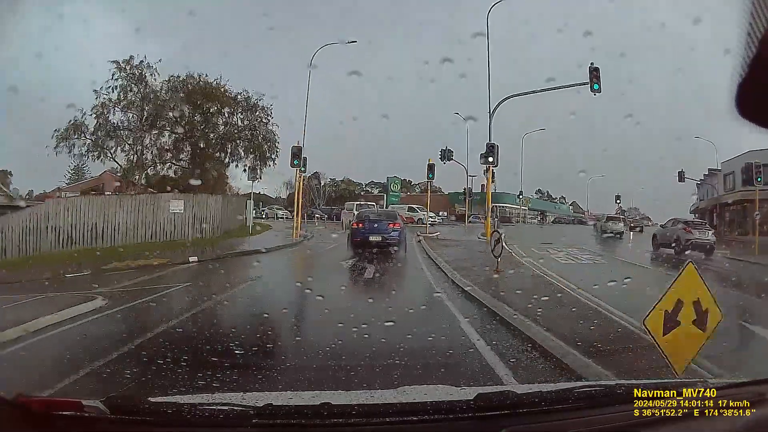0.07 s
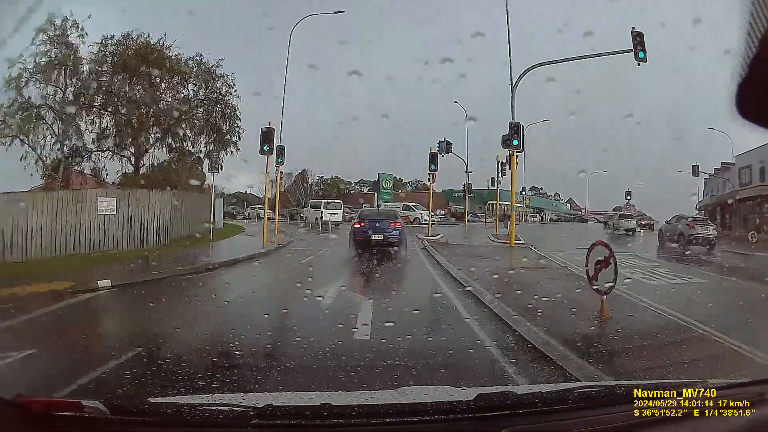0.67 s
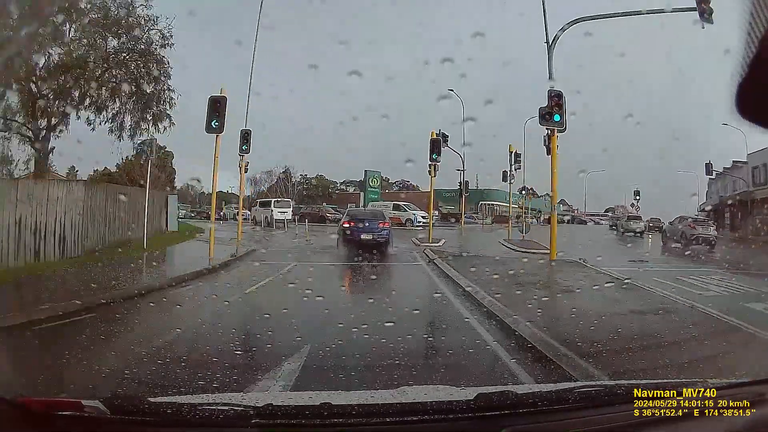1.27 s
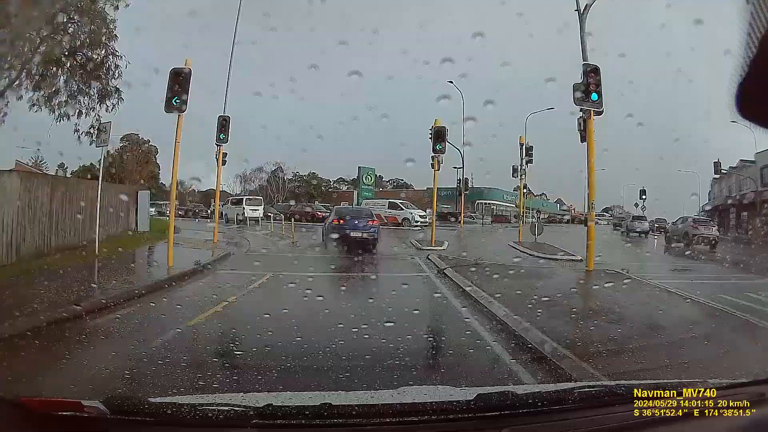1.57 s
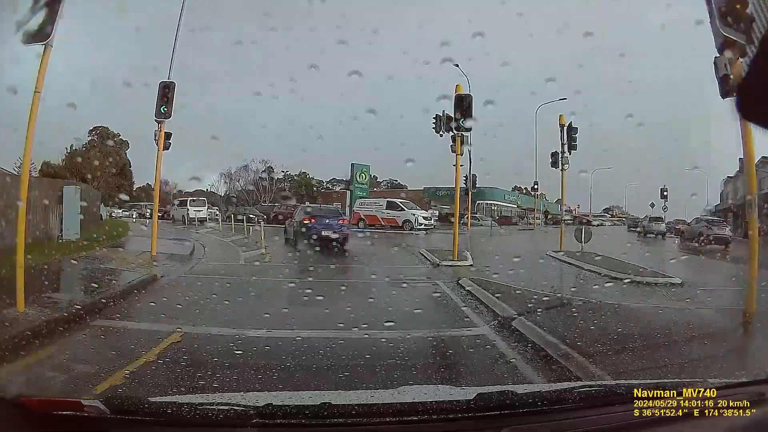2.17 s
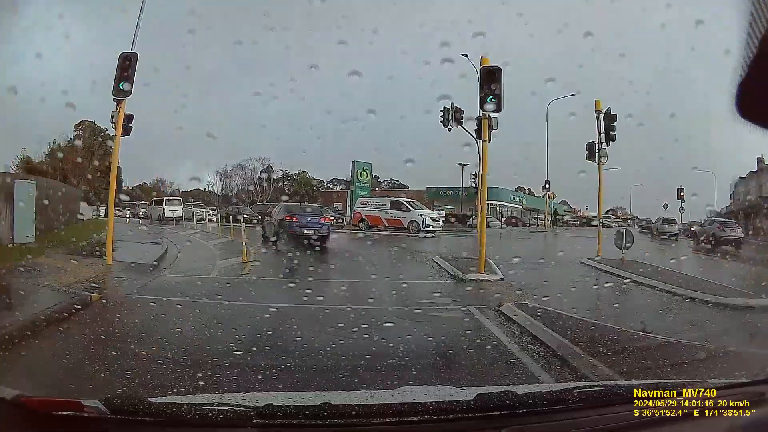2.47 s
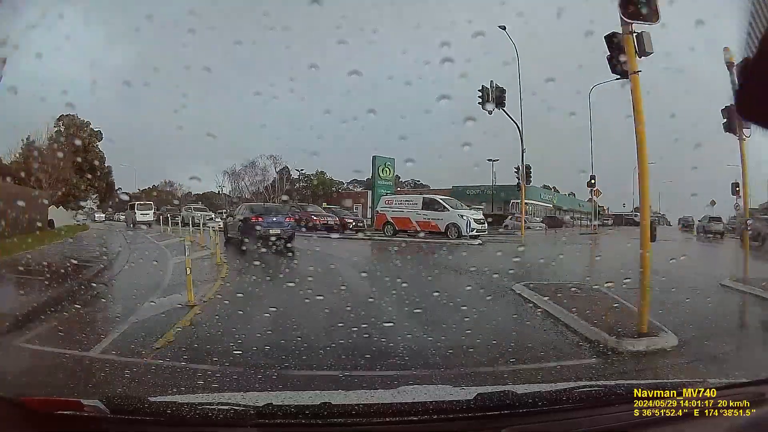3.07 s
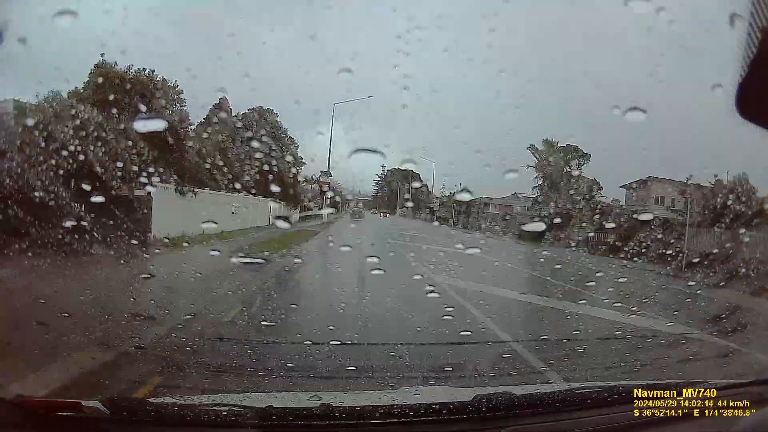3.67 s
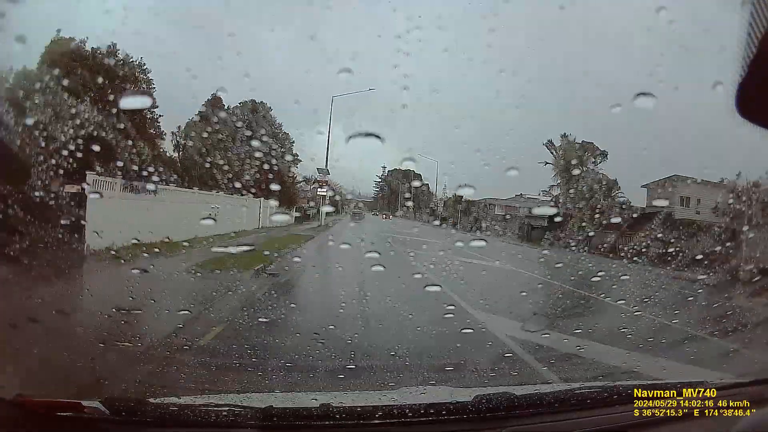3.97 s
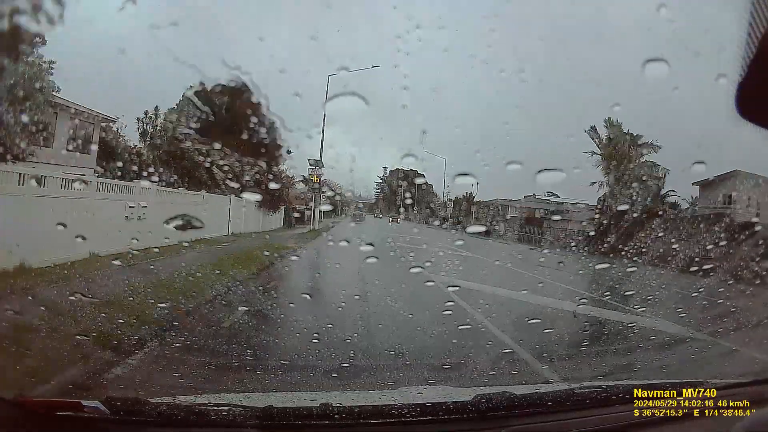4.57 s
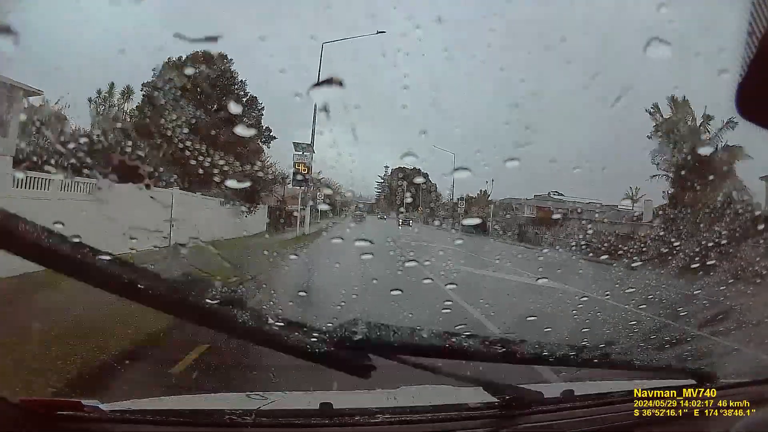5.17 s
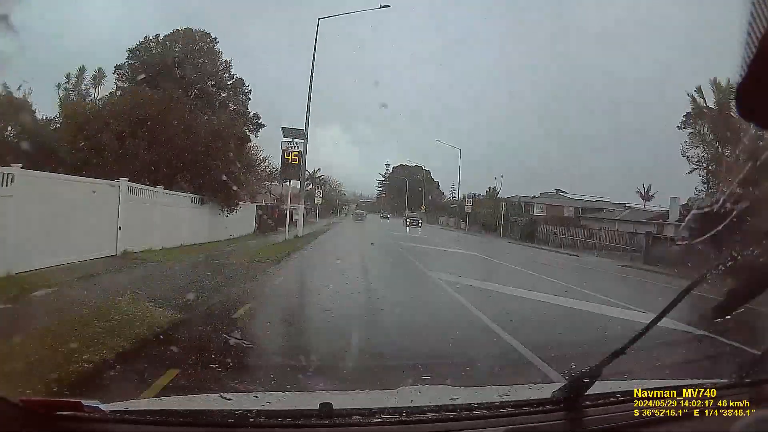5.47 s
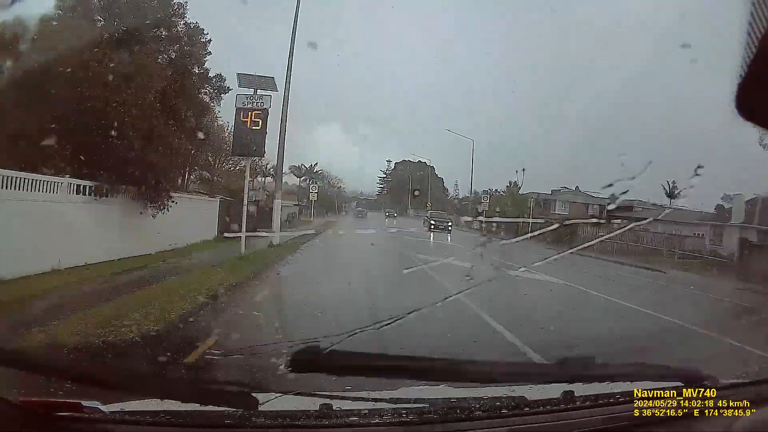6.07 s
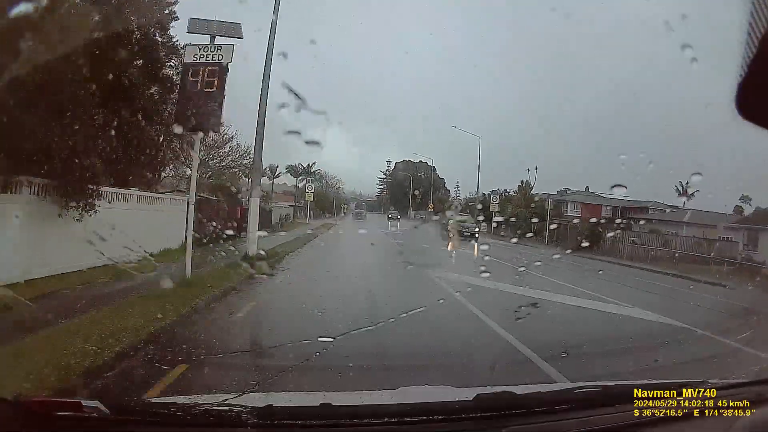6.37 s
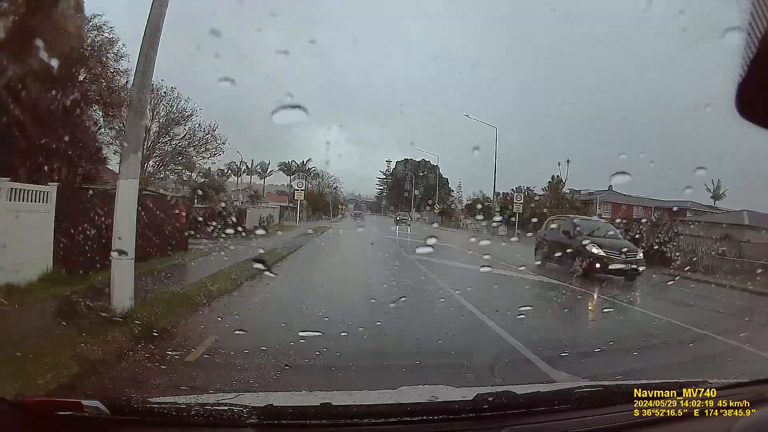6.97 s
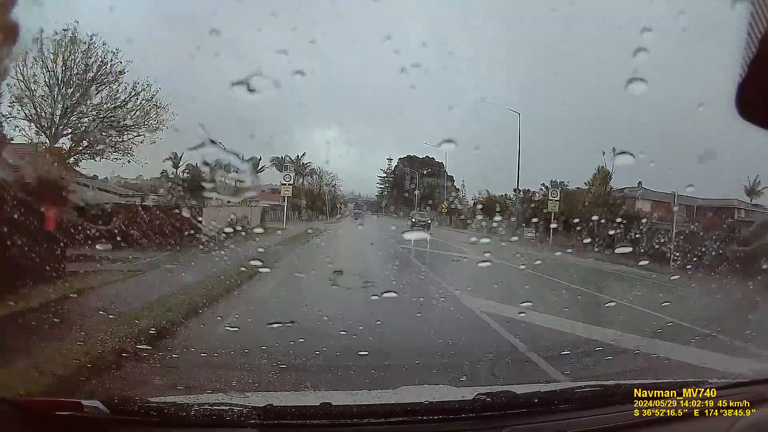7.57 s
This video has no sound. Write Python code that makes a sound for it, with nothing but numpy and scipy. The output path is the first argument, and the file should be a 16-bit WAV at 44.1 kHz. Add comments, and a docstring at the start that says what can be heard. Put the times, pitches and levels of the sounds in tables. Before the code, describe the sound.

Inside a car, engine hum and tyre rumble in light rain switch abruptly to a loud downpour pelting the windscreen and roof.

```python
"""Inside a car on a wet road, heard from a small camera fixed to the windscreen.
The car pulls gently through a junction in light rain: the engine hums, a gear whine rises, the tyres
rumble and drops tick on the glass. After an abrupt cut it drives faster through a downpour, and the
wheels thump over a bump. Each drop is an impulse that excites what it strikes: the glass cracks,
the roof drums and the camera housing rings in its natural modes."""
import sys
import numpy as np
from scipy import signal
from scipy.fft import rfft, irfft
from scipy.io import wavfile
from scipy.ndimage import uniform_filter1d

SR = 44100
rng = np.random.default_rng(int(sys.argv[2]) if len(sys.argv) > 2 else 0)


def pcm_store(signal):
    """Save signal as 16-bit PCM."""
    levels = np.round(np.clip(np.atleast_2d(signal), -1, 1) * 32767)
    wavfile.write(sys.argv[1], SR, levels.astype(np.int16).T)


N = 344862
TIME = np.arange(N) / SR
CUT_START_S, CUT_END_S = 3.666, 3.687

# A drop's crack through the glass, and its spray. Each row: frequency in Hz, relative density in dB.
CRACK_SPECTRUM = [(300, -20.5), (800, -5), (1250, 2), (1500, 0.5), (1800, -0.5), (2150, 0.5), (2420, -7),
                  (2780, -16), (3700, -11), (4270, -6.5), (4750, -22), (5300, -22), (7000, -28.5),
                  (15000, -52)]
SPRAY_SPECTRUM = [(2000, 7), (5000, 4), (6000, 2), (6700, -1.5), (8000, 0), (9600, -5.5), (11800, -2.5),
                  (13300, 1.5), (14500, -2.5), (15800, -15)]
# Modes of the pane and of the housing. Each row: frequency in Hz, gain in dB, 60 dB decay in seconds.
PANE_MODES = [(2186, -3.5, 0.02), (2295, -3.5, 0.013), (4235, -10, 0.011)]
HOUSING_MODES = [(1036.4, 3, 0.053), (1090, -4, 0.027), (926, -9, 0.022)]

def windscreen(big, rain_db, spray_db, patter_db):
    """Impact excitation: drops crack on the glass and ring pane and housing; faster ones spray more."""
    big_crack, big_ring, big_tick, big_spray = big
    small = from_db(rain_db) * shower(per_s=230, spread_db=9.5, max_sigma=1.26)
    droplets = from_db(rain_db) * shower(per_s=720, spread_db=8, max_sigma=2.6)
    blows = from_db(-3) * small + from_db(-14.5) * droplets + from_db(6.5) * big_crack
    crack = colour(scatter(blows, t60=0.015, cabin_db=-4, cabin_t60=0.053), CRACK_SPECTRUM)
    fine_spray = from_db(spray_db) * (from_db(-16.5) * small + from_db(-15.5) * droplets)
    spray = fine_spray + from_db(24) * big_spray
    splash = colour(scatter(spray, t60=0.01, cabin_db=0.5, cabin_t60=0.035), SPRAY_SPECTRUM)
    tick = struck(from_db(-20.5) * small + from_db(5.5) * big_tick, PANE_MODES, swell_t60=0.0039)
    # the housing also picks up the patter from all over the pane
    patter = from_db(rain_db + patter_db) * shower(per_s=900, spread_db=3, max_sigma=2.4)
    housing_blows = from_db(-23) * small + patter + from_db(1.5) * big_ring
    return crack + splash + tick + struck(housing_blows, HOUSING_MODES, swell_t60=0.0062)


# The biggest drops. Each row: start in seconds, strength in dB, then ring, tick and spray in dB above it.
BIGGEST_DROPS = [(0.3596, -24.5, -9, -18, -39), (0.5372, -26, -10, -19, -36), (1.2036, -25, -9, -16, -39),
                 (1.2517, -31, -9, -15, -33), (1.3854, -28, -5, -16, -33), (1.4127, -23.5, -12, -17, -37),
                 (1.509, -27.5, -21, -5, -35), (1.708, -27, -9, -19, -34), (1.849, -26, -14, -20, -39),
                 (1.917, -26.5, -13, -8, -34), (2.1104, -30, -10, -18, -29), (2.3315, -27.5, -15, -9, -31),
                 (2.393, -34, -18, 2.5, -35), (2.9065, -25, -8, -9, -34), (3.0003, -28.5, -8, -14, -35),
                 (3.688, -5.5, -17, -14, -23.5), (3.7506, -8, -5, -11, -18),
                 (3.8193, -2.5, -8.5, -10.5, -26), (3.8254, -6, -10, -15, -23),
                 (3.9404, -4.5, -11, -25, -23.5), (3.9718, -1.5, -5.5, -26, -25.5),
                 (4.0488, 2.5, -12, -18, -24.5), (4.2174, -3.5, -21, -8.5, -26),
                 (4.2808, 0.5, -17, -27, -27.5), (4.3276, -5.5, -15, -13, -22), (4.3783, -14, -7, -20, -28),
                 (4.4509, -4.5, -7.5, -15, -37), (4.4847, 2.5, -16.5, -24, -27),
                 (4.583, -2.5, -6, -21, -22.5), (4.6537, -8.5, -11, -17, -23), (4.67, 0, -9, -14, -25),
                 (4.8155, 1.5, -12.5, -16, -26.5), (4.8855, -6, -8, -11, -21), (5.036, -9.5, -17, -6, -28),
                 (5.0906, -3.5, -15, -20, -34), (5.1402, -2, -5.5, -24, -23.5),
                 (5.3084, -0.5, -10.5, -3.5, -26), (5.335, -6, -11, -6.5, -33), (5.3702, -3, -5, -23, -24),
                 (5.4201, -10, -8, -11, -32), (5.4826, -8, 0.5, -16, -38), (5.5082, -3.5, -6, -19, -26),
                 (5.7098, -14, -6, -15, -26), (5.797, -5, -11, -17, -35), (5.8562, -1.5, -5, -18, -25),
                 (5.9095, -2, -15, -12, -25), (6.0875, -4, -6.5, -14, -23), (6.1753, -3.5, -5, -24, -34),
                 (6.2228, -3.5, -13, -10, -32), (6.2673, -1, -4.5, -20, -21), (6.3035, -3, -9, -15, -28),
                 (6.324, -7, -13, -18, -34), (6.5236, -3.5, -8, -18, -29), (6.6189, 3, -13.5, -21, -30),
                 (6.685, 3, -23, -18, -29.5), (6.7308, -3, -17, -15, -29), (6.8957, -11, -6, -14, -27),
                 (6.9257, -1, -8, -18, -29), (6.9552, -6, -9, -9, -25), (6.977, -1, -12.5, -13, -30),
                 (7.0464, -9.5, -8, -17, -33), (7.117, -1.5, -11, -20, -31), (7.198, -8.5, -11, -2.5, -39),
                 (7.2754, -6.5, -16, -15, -25), (7.3446, -6, -10.5, -19, -19.5), (7.366, -8, -8, -8, -32),
                 (7.4549, -6, -7, -19, -22), (7.4621, -8, -5, -17, -20), (7.5909, -8.5, -9, -21, -16.5),
                 (7.7196, -7.5, -14, -6, -20)]

def big_drops(rain_db):
    """Brief impacts act as impulses: one train each for crack, housing ring, pane tick and spray."""
    start_s, strength_db, *colour_db = np.vstack([middling_drops(rain_db), BIGGEST_DROPS]).T
    blows = np.zeros((4, N))
    blows[:, np.round(start_s * SR).astype(int)] = from_db([strength_db + db for db in (0, *colour_db)])
    return blows


def middling_drops(rain_db, per_s=20, above_rain_db=11.5):
    """The point of impact sets the timbre: each random drop gets its own ring, tick and spray levels."""
    chance = rng.standard_normal((400, 5))
    start_s = (np.arange(len(chance)) + chance[:, 0] / 3) / per_s
    strength_db = np.interp(start_s, TIME, rain_db) + above_rain_db + np.clip(chance[:, 1], -2, 1)
    colour_db = [-11, -15.5, -25] + 5 * np.clip(chance[:, 2:], -2, 1)
    return np.column_stack([start_s, strength_db, colour_db])[(start_s > 0) & (start_s < TIME[-1])]


# Light rain, then the downpour. Each row: time in seconds, strength in dB.
RAIN_TREND = [(0, -53.5), (.4, -50.5), (1.0, -52), (1.25, -49.5), (1.7, -50), (2.0, -52), (3.25, -53),
              (3.66, -48), (3.69, -24.5), (4.6, -22.5), (5.35, -20.5), (5.75, -21.5), (6.35, -21.5),
              (7.25, -25), (7.82, -22.5)]
# Lulls between sheets of rain. Each row: centre in seconds, half length in seconds, depth in dB.
RAIN_LULLS = [(4.203, 0.019, 15), (4.762, 0.026, 4.5), (4.872, 0.0098, 7), (4.965, .035, 8),
              (5.216, 0.024, 9), (6.479, 0.019, 12), (6.703, 0.015, 17), (7.021, 0.011, 12)]

def rainfall():
    """Amplitude modulation: rain arrives in uneven sheets, so its strength in dB surges and dips."""
    trend_db, = in_time(RAIN_TREND)
    surge_db = 2.05 * drift(per_s=26)
    lull_db = sum(depth_db * np.exp(-((TIME - s) / half_s) ** 2) for s, half_s, depth_db in RAIN_LULLS)
    return trend_db + surge_db - lull_db


# Response of the lined roof. Each row: frequency in Hz, relative density in dB.
ROOF_SPECTRUM = [(70, -39), (140, -5), (200, -2.5), (275, 1), (325, -2), (425, 3), (560, -1), (660, 1.5),
                 (900, -3), (1300, -10.5), (2500, -24.5), (6000, -44)]
# Dull knocks: a small rattle as the car meets a bump, then heavy splats on the roof.
# Each row: start in seconds, strength in dB.
DULL_KNOCKS = [(2.555, -11), (4.31, 2), (4.68, 7), (5.04, 9), (5.722, 9.5), (5.86, 9), (6.134, 6.5),
               (6.19, 5), (6.745, 10.5), (7.29, 5), (7.454, 6)]

def roof(big_blows, roof_db):
    """Superposition: drops on the steel roof merge into a drumming, with a dull knock now and then."""
    drops = shower(per_s=900, spread_db=5, max_sigma=1.8)
    start_s, knock_db = np.transpose(DULL_KNOCKS)
    knocks = np.zeros(N)
    knocks[np.round(start_s * SR).astype(int)] = from_db(knock_db)
    blows = from_db(roof_db - 1) * drops + from_db(2.5) * big_blows
    drumming = scatter(blows, t60=0.02, cabin_db=-2.5, cabin_t60=0.062)
    return colour(drumming + scatter(knocks, t60=0.087, cabin_db=1, cabin_t60=0.15), ROOF_SPECTRUM)


# Wheel jolts. Each row: centre in seconds, envelope peak in dB, frequency in Hz, half length in seconds.
WHEEL_JOLTS = [(1.302, -36, 55, .03), (2.584, -30, 60, 0.055), (3.963, -9.5, 112, 0.015),
               (4.048, -9, 123, 0.013), (4.169, -14, 105, 0.0045), (4.245, -23, 58.4, 0.046),
               (7.63, -23.5, 58, 0.057)]

def bumps():
    """Transient response: a wheel crossing a bump booms in the cabin, a sine under a Gaussian envelope."""
    return sum(from_db(db) * np.exp(-((TIME - s) / half_s) ** 2) * np.sin(2 * np.pi * hz * (TIME - s))
               for s, db, hz, half_s in WHEEL_JOLTS)


# Tyres on the road. Each row: time in seconds, cabin rumble in dB, body shake in dB.
ROAD_LEVELS = [(0, -33, -42), (2.0, -32.5, -49), (3.66, -30.5, -44), (3.69, -32.5, -46), (5.0, -31, -44),
               (6.7, -33, -45), (7.82, -32.5, -34)]
# Cabin rumble and body shake. Each row: frequency in Hz, relative density in dB.
RUMBLE_SPECTRUM = [(40, -26), (78, -19), (100, -2), (130, 5.5), (160, -3), (200, -5), (275, -1.5),
                   (325, -8), (460, -11), (640, -14.5), (750, -20), (1200, -23.5), (2300, -34), (2900, -41),
                   (9000, -61)]
SHAKE_SPECTRUM = [(12, -14), (22, -11), (33, -13), (45, -6), (58, 6), (78, -7), (120, -26), (400, -59)]

def road(settle_s=0.14):
    """Forced vibration: tyres drive the cabin and the sprung body; both flare at a bump and settle."""
    rumble_db, shake_db = in_time(ROAD_LEVELS)
    jolt = sum(from_db(db) * (TIME > s) * np.exp(-np.abs(TIME - s) / settle_s)
               for s, db, _, _ in WHEEL_JOLTS)
    rumble = np.hypot(from_db(rumble_db + drift(per_s=9)), from_db(-16.5) * jolt)
    shake = np.hypot(from_db(shake_db), from_db(-22) * jolt)
    return rumble * colour(noise(), RUMBLE_SPECTRUM) + shake * colour(noise(), SHAKE_SPECTRUM)


# The engine's course. Each row: time in seconds, firing rate in Hz, hum level in dB.
ENGINE_COURSE = [(0, 45.95, -45.5), (1.8, 46.78, -38), (2.5, 48.8, -35), (3.66, 52.5, -33.5),
                 (3.69, 53.9, -49), (5.5, 55.34, -47), (6.8, 56.1, -48), (7.82, 57.8, -42)]
# Its harmonics. Each row: multiple of the firing rate, relative level in dB.
ENGINE_ORDERS = [(1, -1), (2, -12), (3, -17), (4, -9.5), (5, -4)]

def engine():
    """Periodic firing gives a harmonic series, each order a little unsteady."""
    firing_hz, hum_db = in_time(ENGINE_COURSE)
    phase = 2 * np.pi * np.cumsum(firing_hz * (1 + 0.0035 * drift(per_s=14))) / SR
    return np.sqrt(2) * sum(from_db(hum_db + db + 2.5 * drift(per_s=11)) * np.sin(round(order) * phase)
                            for order, db in ENGINE_ORDERS)


# Drivetrain whine while pulling away. Each row: time in seconds, level in dB.
WHINE_LEVELS = [(0, -63), (1.2, -59), (2.2, -47), (3.1, -46.5), (3.66, -41), (3.69, -80)]

def gear_whine(order=12.48):
    """Gears mesh at a fixed multiple of engine speed, so their thin, wavering tone climbs with it."""
    firing_hz, _ = in_time(ENGINE_COURSE)
    level_db, = in_time(WHINE_LEVELS)
    waver_db = 1.8 * drift(per_s=16)
    phase = 2 * np.pi * np.cumsum(order * firing_hz) / SR + 0.55 * drift(per_s=40)
    return np.sqrt(2) * from_db(level_db + waver_db) * np.sin(phase)


def shower(per_s, spread_db, max_sigma):
    """A Poisson process: drops land independently, with capped log-normal sizes; rms 1."""
    lands = rng.random(N) < per_s / SR
    clicks = lands * from_db(spread_db * np.minimum(noise(), max_sigma)) * np.sign(noise())
    return clicks / np.sqrt(np.mean(clicks ** 2) + 1e-20)


def scatter(clicks, t60, cabin_db, cabin_t60):
    """Reverberation: a click spreads into a burst as waves cross a panel, then lingers in the cabin."""
    energy = 0
    for kept, share in ((decay(t60) ** 2, 1), (decay(cabin_t60) ** 2, from_db(cabin_db) ** 2)):
        energy += share * signal.lfilter([1 - kept], [1, -kept], clicks ** 2 + 1e-18)
    return np.sqrt(energy) * np.sign(noise())


def struck(clicks, modes, swell_t60, spread_db=1.5):
    """Modal vibration: each mode swells, then rings out; their balance changes from blow to blow."""
    ringing = 0
    for hz, db, t60 in modes:
        blows = clicks * from_db(db + spread_db * np.clip(noise(), -2, 1))
        ringing += ring(blows, hz, t60) - ring(blows, hz, swell_t60)
    return ringing


def ring(clicks, hz, t60):
    """A damped oscillator: a unit click starts a decaying sine of height 1."""
    kept, step = decay(t60), 2 * np.pi * hz / SR
    return signal.lfilter([0, np.sin(step)], [1, -2 * kept * np.cos(step), kept * kept], clicks + 1e-18)


def colour(x, spectrum, size=8192):
    """Minimum-phase filtering: a causal response of unit energy with the given spectrum."""
    hz, db = np.transpose(spectrum)
    grid_hz = np.maximum(np.arange(size // 2 + 1) * SR / size, 1)
    gain = from_db(np.interp(np.log(grid_hz), np.log(hz), db))
    cepstrum = irfft(np.log(gain))
    cepstrum[1:size // 2] *= 2   # folding onto positive time makes it causal
    cepstrum[size // 2 + 1:] = 0
    response = irfft(np.exp(rfft(cepstrum)))
    return signal.oaconvolve(x, response / np.linalg.norm(response))[:N]


def decay(t60):
    """Exponential decay: amplitude kept per sample to lose 60 dB in t60 seconds."""
    return np.exp(-np.log(1000) / (t60 * SR))


def drift(per_s):
    """Slow random variation: straight lines between Gaussian values of spread 1."""
    knots = rng.standard_normal(2000)
    return np.interp(TIME * per_s, np.arange(len(knots)), knots)


def in_time(rows):
    """Linear interpolation of each column at every sample."""
    times_s, *columns = np.transpose(rows)
    return np.array([np.interp(TIME, times_s, column) for column in columns])


def noise():
    return rng.standard_normal(N)


def from_db(db):
    return 10 ** (np.asarray(db) / 20)


def scene():
    """Sound pressures add: rain and car, first at the junction, then in the downpour at speed."""
    fast = TIME > CUT_START_S
    rain_db = rainfall()
    big = big_drops(rain_db)
    glass = windscreen(big, rain_db - 1.2, spray_db=np.where(fast, 0, -3),
                       patter_db=np.where(fast, -26, -19.5))
    roof_db = np.where(fast, 0.36 * rain_db - 14, rain_db + 5.5)   # the wide roof evens out the downpour
    return (glass + roof(big[0], roof_db) + road() + engine() + gear_whine() + bumps())[None]


def record(dry, cutoff_hz=15750):
    """Gating, clipping and band limiting: silence at the cut, overload on hard hits, no extreme treble."""
    gate = uniform_filter1d(1.0 * ((TIME < CUT_START_S) | (TIME > CUT_END_S)), size=32)
    low_pass = signal.ellip(10, 0.1, 80, cutoff_hz, fs=SR, output="sos")
    return signal.sosfilt(low_pass, np.clip(dry * gate, -1, 1))


dry = scene()
out = record(dry)
pcm_store(out)
```